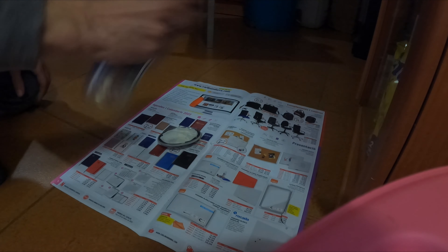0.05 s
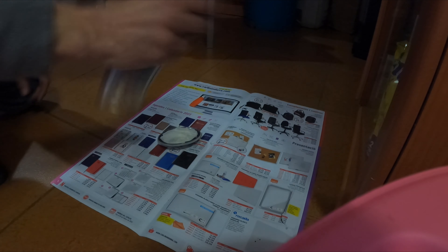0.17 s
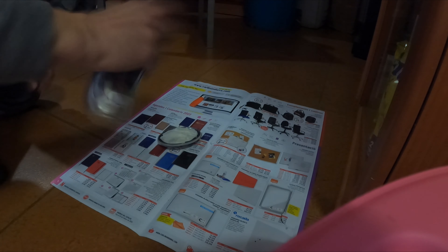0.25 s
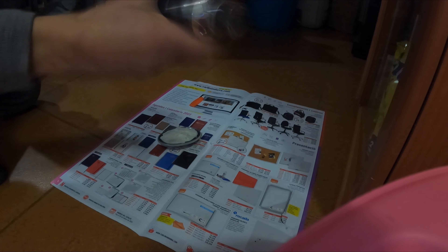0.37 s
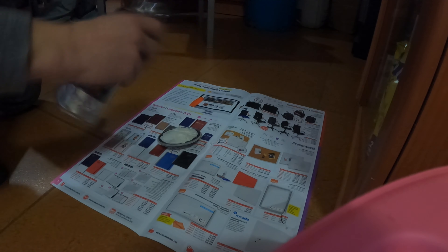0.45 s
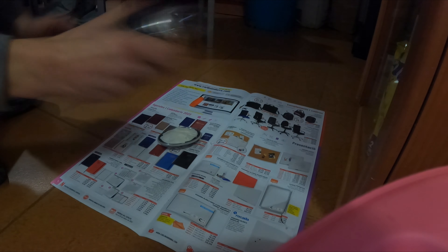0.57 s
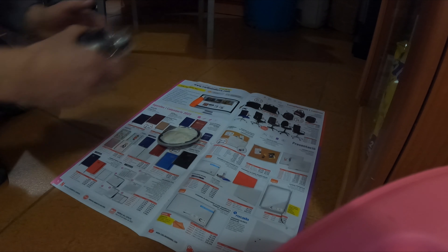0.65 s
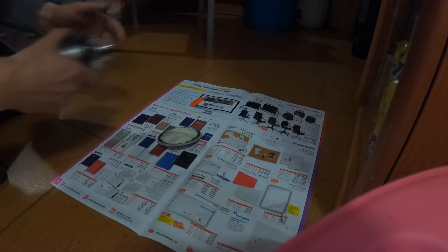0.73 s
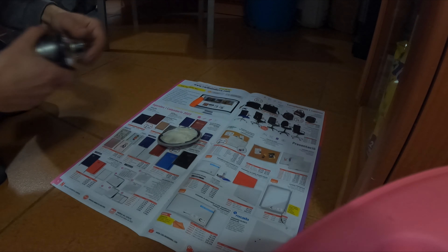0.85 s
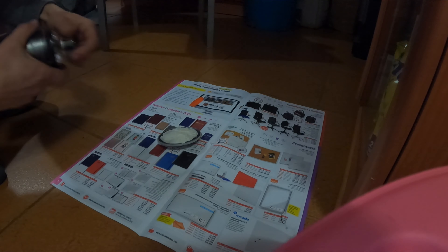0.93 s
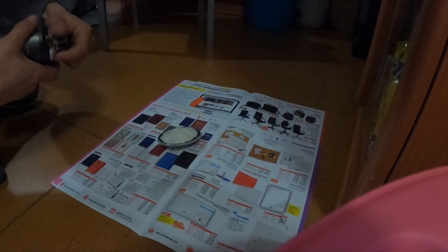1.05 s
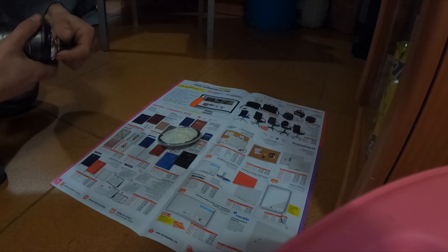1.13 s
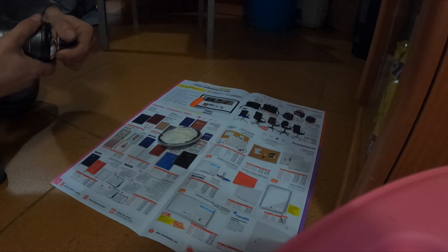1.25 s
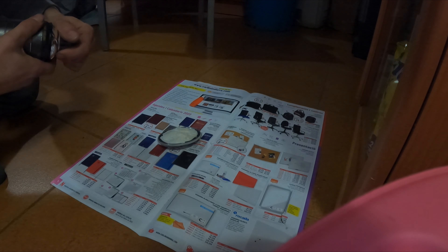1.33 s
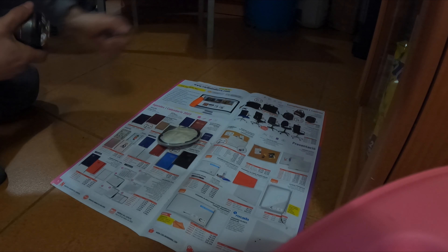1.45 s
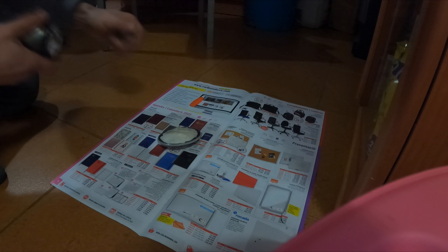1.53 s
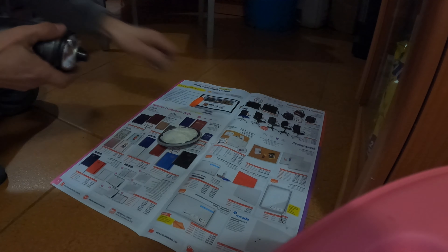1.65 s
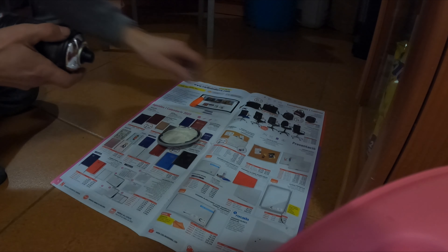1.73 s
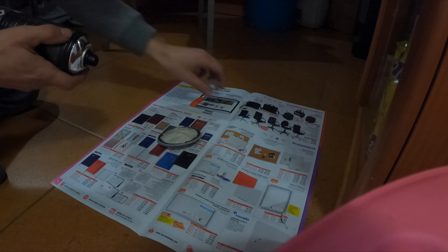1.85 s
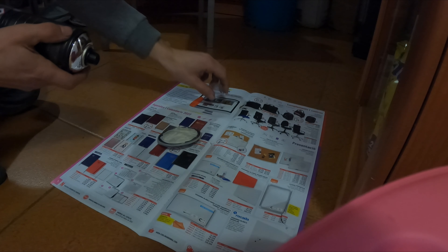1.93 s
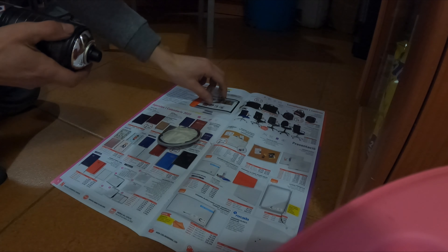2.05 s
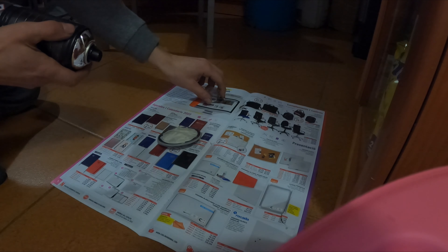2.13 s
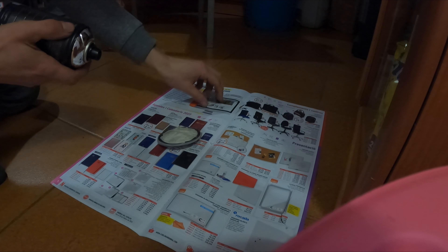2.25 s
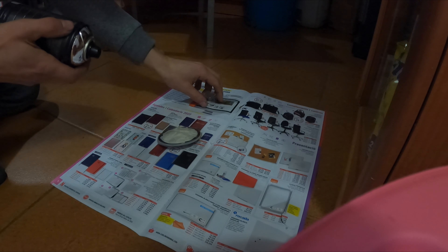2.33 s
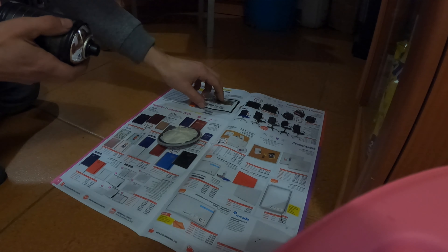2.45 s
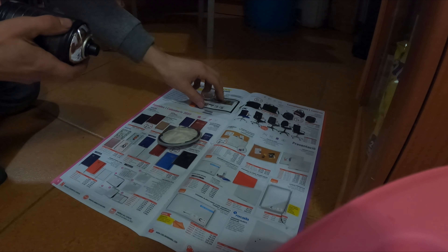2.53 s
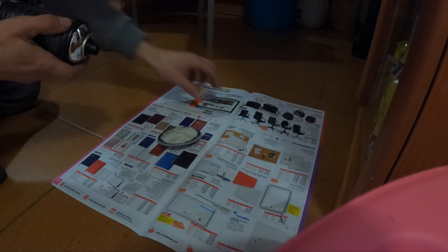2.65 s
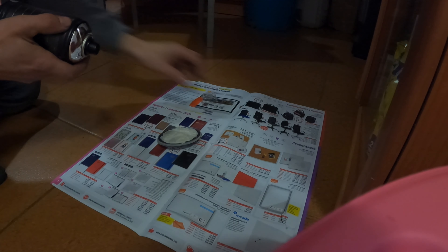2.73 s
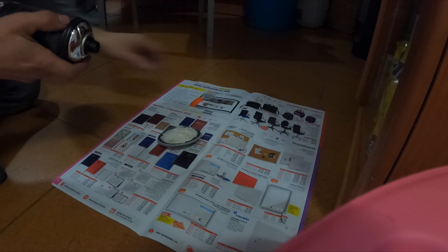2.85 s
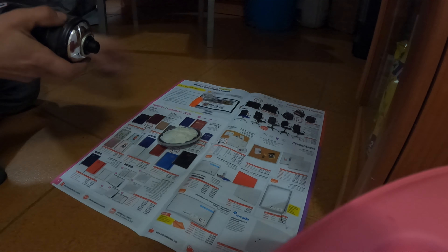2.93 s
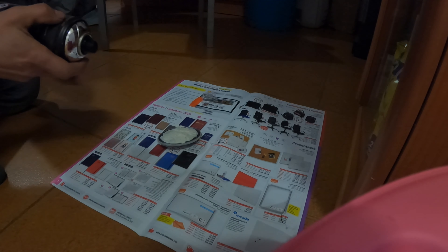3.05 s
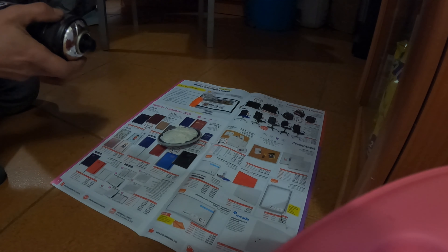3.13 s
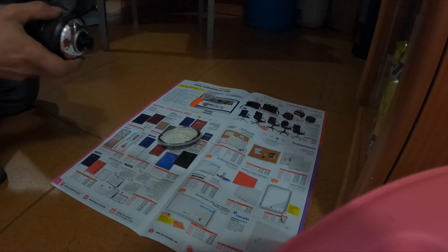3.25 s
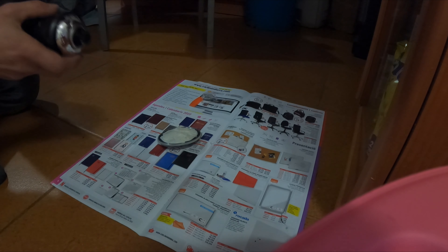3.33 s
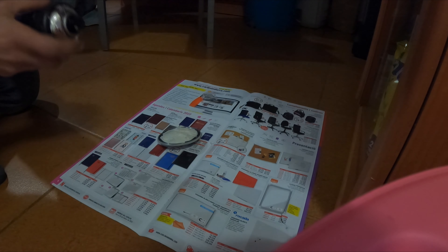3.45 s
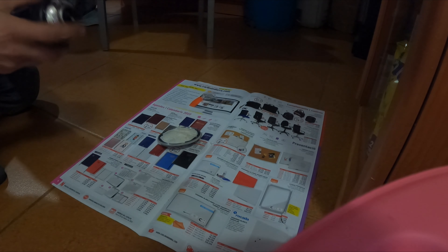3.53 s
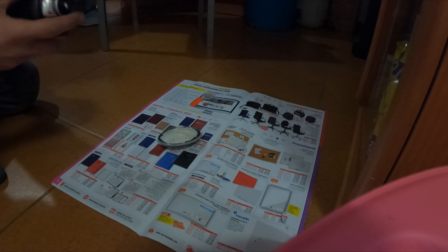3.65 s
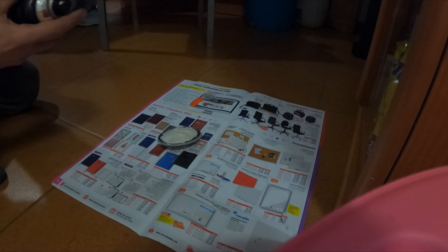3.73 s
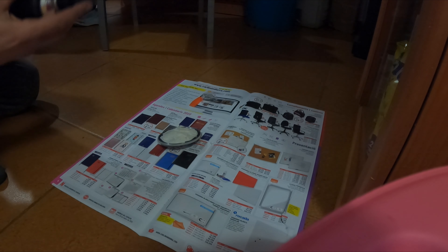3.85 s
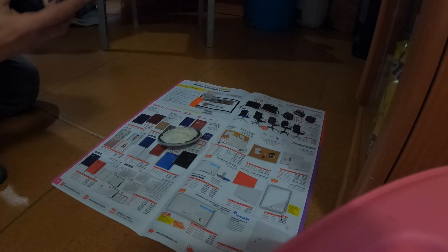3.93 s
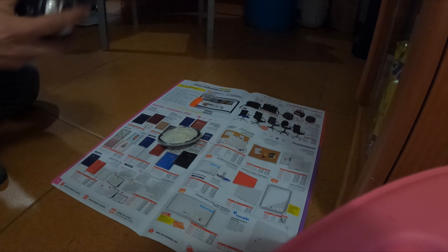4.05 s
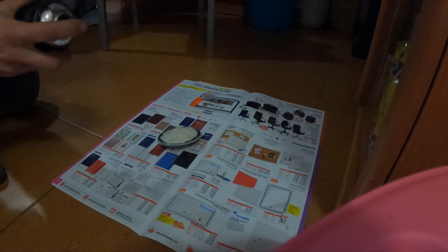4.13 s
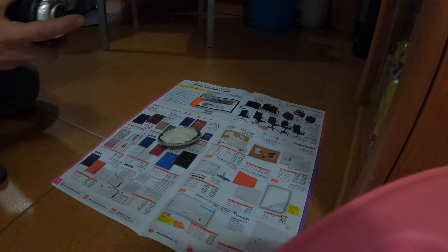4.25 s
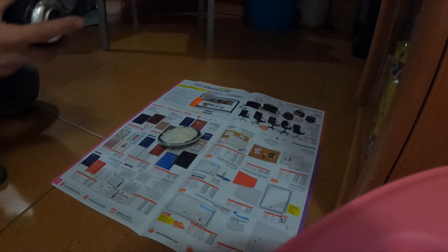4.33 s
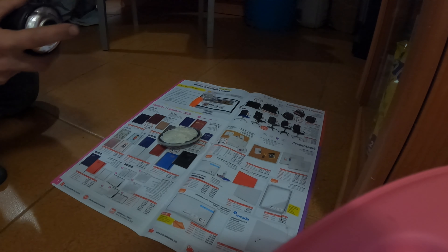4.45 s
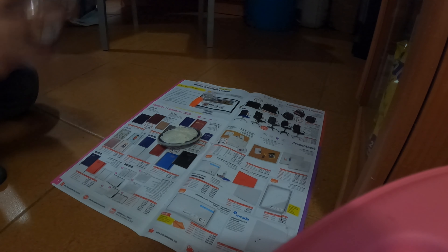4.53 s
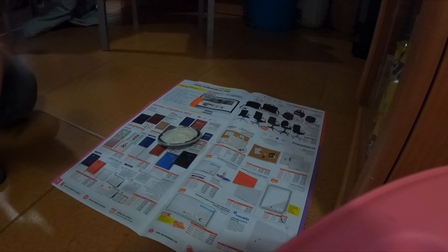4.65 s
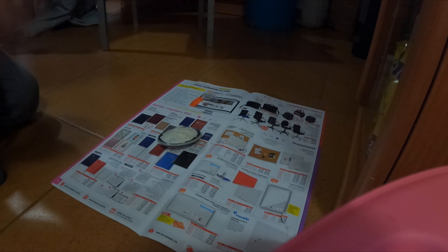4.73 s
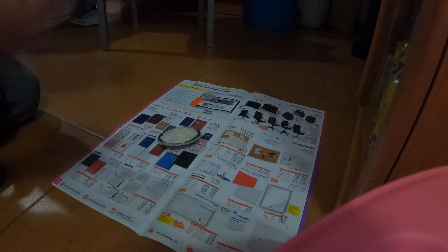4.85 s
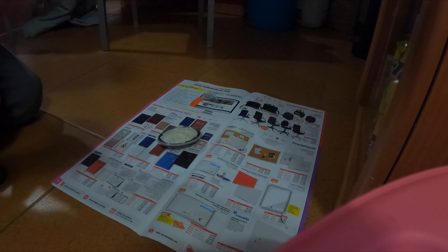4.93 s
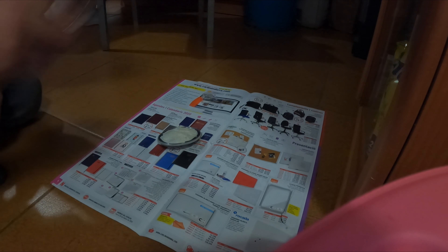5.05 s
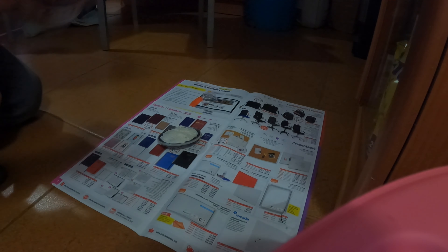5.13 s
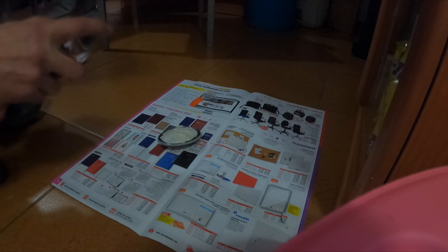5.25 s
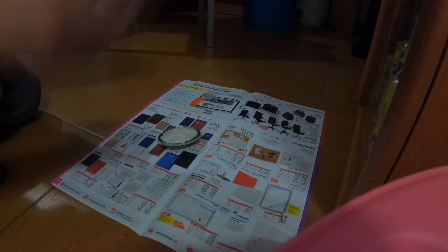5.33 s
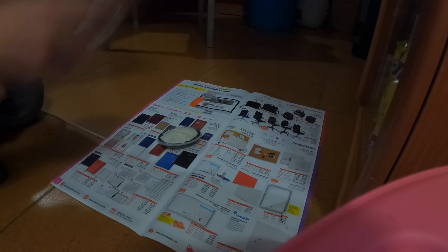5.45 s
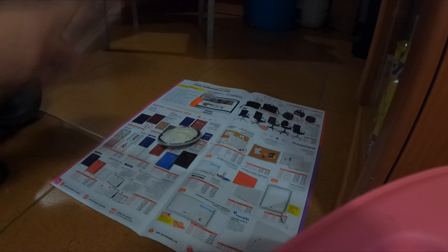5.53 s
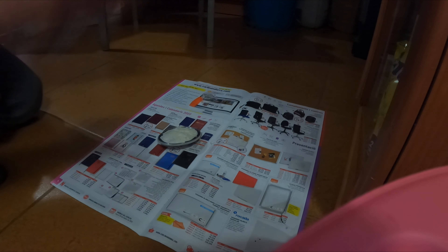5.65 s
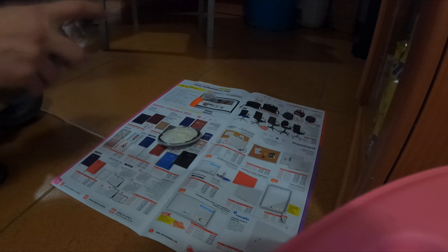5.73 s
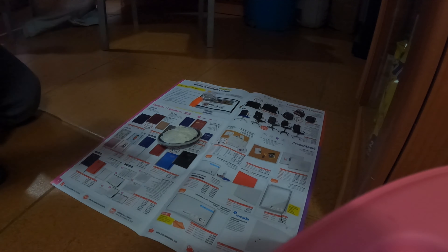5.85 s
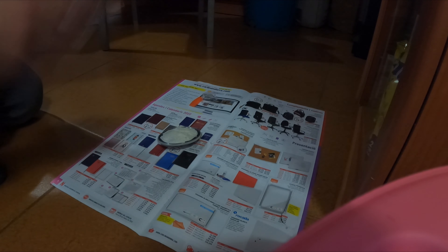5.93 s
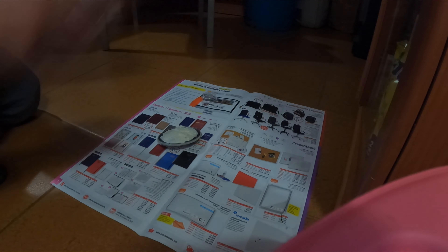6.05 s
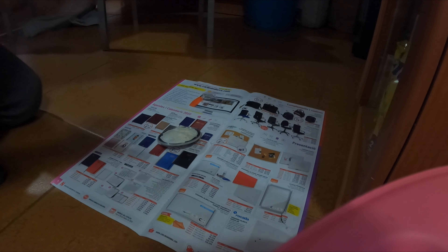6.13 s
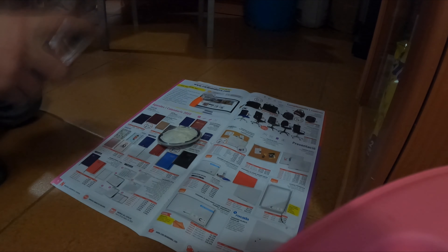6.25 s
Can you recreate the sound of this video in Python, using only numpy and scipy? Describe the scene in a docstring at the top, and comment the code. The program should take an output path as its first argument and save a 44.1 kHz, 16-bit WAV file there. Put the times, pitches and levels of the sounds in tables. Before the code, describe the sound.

Close to the microphone in a small tiled room, a metal spray can is shaken, its mixing ball clacking brightly through sloshing paint. The rattle thins to small rolling clicks as the can is tilted. A plastic cap is set down with two quick, faint hollow taps. After near quiet and a few light knocks, vigorous shaking returns, with low puffs of air bumping the microphones. Faint rumble and motor hum lie beneath.

```python
"""Close by in a small tiled room, a steel aerosol can is shaken over a low rumble, far-off hum and room tone.
Its contents roll and slosh in quick swells and the mixing ball knocks, exciting damped modes of dome and wall.
The can is tilted, then at 2.5 s its plastic cap is set down with two hollow taps. Sparse rolling and knocks
lead to hard shaking from 4.7 s, whose strokes puff air at the microphones: a push, a swing back, turbulence.
Echoes from the room follow can and cap: noise tails whose pattern shifts slowly."""
import sys
import numpy as np
from scipy import signal
from scipy.fft import rfft, irfft
from scipy.io import wavfile
from scipy.ndimage import uniform_filter1d

SR = 44100
rng = np.random.default_rng(int(sys.argv[2]) if len(sys.argv) > 2 else 0)


def wav_record(signal):
    """Record a signal, one row per channel, as 16-bit PCM in the file named by sys.argv[1]."""
    frames = np.transpose(np.atleast_2d(signal))
    bounded = np.clip(frames, -1, 1)
    # unit amplitude maps onto the largest positive 16-bit level
    quanta = np.round(bounded * 32767).astype(np.int16)
    wavfile.write(sys.argv[1], SR, quanta)


N = 277389

# The low rumble, a drone with loose noise. Each row: time in seconds, level in dB.
RUMBLE_LEVEL = [(0, -51), (.3, -51.5), (1, -53), (1.45, -58), (2.1, -56.5), (2.84, -66), (3.075, -48.5),
                (3.3, -73.5), (3.84, -70), (4.3, -58.5), (4.86, -52), (5.3, -69), (5.6, -64), (6.29, -59.5)]
RUMBLE_HZ, RUMBLE_NOISE = 28.2, 0.35   # drone pitch; rms of the noise relative to the drone
# The hum of a far-off appliance. Each row: time in seconds, level in dB about which it wavers.
HUM_LEVEL = [(0, -66.5), (.9, -67.5), (2.4, -62.5), (3.4, -61), (4.7, -65), (6.29, -70.5)]
# Weaker orders of the same motor. Each row: share of the hum pitch, mean level in dB relative to the main tone.
HUM_LOWER_ORDERS = [(.25, -12.5), (.5, -15.5), (.75, -9.5)]
HUM_HZ, HUM_NOISE = 194.5, 0.55   # pitch; rms of narrow noise relative to the main tone
HUM_WAVER_DB = 2.5
# Spectrum of the room tone. Each row: frequency in Hz, relative density in dB per Hz.
AIR_SPECTRUM = [(60, -33.5), (100, -16), (150, -3.5), (250, -9.5), (400, -12), (700, -19.5), (1300, -16.5),
                (1900, -32.5), (2550, -23.5), (3300, -42.5), (6000, -52), (14000, -34)]
AIR_LEVEL_DB = -67.0
# Quick swells of the rolling and sloshing: shaking strokes, and small rustles near 2.5 to 3.1 s. Levels
# before the can's filters. Each row: crest in seconds, dome level in dB, wall level in dB, hold in seconds.
SWELLS = [(0, -38, -37.5, 0.0021), (0.117, -42, -33.5, 0.0046), (0.197, -42.5, -42.5, 0.0069),
          (0.314, -39, -35.5, 0.0065), (0.429, -39.5, -31.5, 0.01), (0.522, -40, -34, 0.011),
          (1.814, -44.5, -68, 0.013), (2.508, -58, -56.5, 0.0055), (2.756, -65.5, -60.5, 0.0046),
          (3.081, -60.5, -55, .01), (3.547, -60, -65, 0.012), (4.312, -46, -46.5, 0.0046),
          (4.645, -49, -56, 0.0078), (4.742, -35, -38, 0.036), (4.943, -36, -34.5, 0.012),
          (5.193, -39, -33.5, 0.023), (5.363, -43.5, -37.5, 0.097), (5.56, -52, -45, 0.036),
          (5.66, -44.5, -38, 0.059), (5.902, -41.5, -34.5, 0.019), (6.068, -44, -41, 0.082),
          (6.205, -53, -41, 0.049)]
SWELL_RISE_DB_PER_S, SWELL_FALL_DB_PER_S = 241, 144
# Steady rolling of the ball through the paint, levels before the can's filters.
# Each row: time in seconds, dome level in dB, wall level in dB.
ROLL_LEVEL = [(0, -77, -84), (.55, -49.5, -48), (.68, -37, -34), (.8, -42, -36), (.95, -49, -41),
              (1.33, -52, -46.5), (1.7, -57, -51.5), (1.86, -46.5, -50), (2.3, -53, -56.5),
              (2.65, -80.5, -70.5), (3.0, -79, -81.5), (3.3, -88, -81), (3.47, -81, -69.5),
              (3.68, -51.5, -50), (3.9, -48.5, -51.5), (4.12, -56, -53.5), (4.25, -54.5, -58),
              (4.56, -66, -68), (4.8, -86, -61), (6.29, -70, -95)]
# Where the paint lies decides which modes stay free; a quick wander is added.
# Each row: time in seconds, freest dome pitch in Hz, freest wall pitch in Hz.
PAINT_POSITION = [(0, 4900, 1540), (.55, 4784, 1524), (.8, 4280, 1995), (1.31, 5380, 1509),
                  (2.0, 5160, 1836), (2.3, 4250, 2140), (2.62, 4290, 1900), (2.76, 4350, 2306),
                  (3.2, 4350, 2200), (3.45, 5610, 1290), (3.6, 6300, 2193), (3.72, 5670, 1600),
                  (3.84, 5580, 1233), (4.0, 5560, 1369), (4.15, 4920, 2090), (4.56, 6270, 1760),
                  (6.29, 4980, 1575)]
PAINT_WANDER = 0.05   # spread as a share of the pitch
GLIDE_DB, GLIDE_WIDTH = -8, 0.07   # gliding band against the ringing modes; filter corner as a share of mean pitch
ROLL_ALIKE, ROLL_ALIKE_LOSS = 1, 0.061   # left-right likeness at 1 kHz; its loss per octave
# Clear knocks of the ball, levels before the can's filters. Each row: start in seconds, dome peak in dB,
# wall peak in dB, freest dome pitch in Hz, freest wall pitch in Hz.
KNOCKS = [(0.0148, -14.5, -18, 4350, 1800), (0.077, -3, -18, 4330, 2980), (0.0837, -13.5, -20, 6100, 1200),
          (0.0922, -7, -31, 4770, 1177), (0.279, -5, -15.5, 5490, 1550), (0.329, -23.5, -15.5, 4120, 1700),
          (0.337, -38, -15.5, 4350, 1430), (0.344, -45, -20, 3260, 1680),
          (0.4236, -12.5, -11.5, 7900, 1790), (0.4395, -22, -13.5, 3000, 1690),
          (0.4551, -39, -21, 3420, 1680), (0.5246, -27, -24, 3330, 1090), (0.6043, -9, -11.5, 4540, 2290),
          (0.627, -41, -16.5, 3070, 1867), (0.6414, -7.5, -7.5, 4350, 1740), (0.6977, -48, -26, 4820, 1940),
          (0.71, -35, -20, 3400, 2000), (0.7507, -29, -19.5, 5600, 1950),
          (0.7992, -23.5, -13.5, 4130, 2080), (0.86, -27, -22.5, 5700, 2800),
          (0.9116, -31, -21, 3070, 2080), (1.008, -33, -25.5, 4200, 1840), (1.063, -26.5, -30, 4660, 2260),
          (1.1874, -34.5, -30, 6130, 1800), (1.2607, -34, -33, 4950, 1800),
          (1.2706, -34, -24.5, 5850, 1070), (1.3952, -27, -28, 6100, 1720), (1.411, -23, -21.5, 7260, 1790),
          (1.4252, -22.5, -27, 3740, 1700), (1.4503, -33, -38, 3780, 1700),
          (1.4675, -21.5, -14.5, 6050, 1530), (1.4719, -22, -11, 7670, 1684),
          (1.4852, -17, -23, 5186, 1700), (1.5568, -7, -24, 5000, 2640), (1.604, -19, -18, 6560, 1710),
          (1.6391, -23, -17, 4440, 1654), (1.669, -30, -32.5, 6700, 1330), (1.724, -20, -15.5, 4700, 1470),
          (1.762, -23, -25.5, 4640, 1140), (1.801, -15, -25, 4380, 1360), (1.805, -9, -26, 4540, 1990),
          (1.876, -9.5, -25, 4560, 1060), (1.9106, -14.5, -34, 4230, 2510),
          (1.9391, -16.5, -32, 5250, 2420), (1.9632, -18, -37, 5400, 2400),
          (1.9715, -7.5, -32.5, 5200, 2310), (1.986, -20.5, -38, 4570, 1940), (2.008, -12, -39, 5200, 2900),
          (2.0344, -22, -42, 5240, 1710), (2.048, -17, -23, 5930, 1700), (2.0534, -25, -45, 5130, 2440),
          (2.0687, -17.5, -40, 5260, 2410), (2.077, -20.5, -46, 5200, 2010),
          (2.0883, -24.5, -51, 5300, 1580), (2.1012, -22.5, -41, 5220, 2000),
          (2.1133, -19, -27.5, 4530, 2040), (2.183, -25.5, -52, 6600, 2560),
          (2.254, -21, -39.5, 6800, 2500), (2.2595, -21.5, -33, 5430, 2030), (2.273, -36, -42, 3760, 2050),
          (2.2903, -28, -56, 4270, 2090), (2.299, -34, -34, 4200, 2090), (2.395, -33, -36, 7850, 2630),
          (2.5133, -37.5, -36, 3980, 1360), (2.7704, -50, -46.5, 4240, 2730),
          (2.7943, -40, -42, 4460, 2730), (3.0048, -51.5, -49, 3470, 2500), (3.073, -43, -47, 3360, 2190),
          (3.0866, -37.5, -50.5, 7740, 2380), (3.489, -47.5, -54.5, 5830, 2600),
          (3.5597, -36, -41, 7600, 2410), (3.595, -16, -21.5, 7650, 2600), (3.6478, -22, -25, 7700, 2120),
          (3.6837, -24.5, -27, 6000, 1570), (3.7099, -30, -30.5, 5020, 2040),
          (3.7283, -27, -31.5, 5700, 2400), (3.898, -29, -36, 7200, 2370),
          (3.975, -27.5, -38.5, 7450, 2480), (4.2217, -41, -51, 4940, 1380), (4.2333, -36, -39, 4640, 2590),
          (4.2722, -21.5, -26.5, 7040, 2580), (4.2974, -20.5, -41, 5300, 1580),
          (4.3024, -19, -26.5, 7100, 2450), (4.3238, -21, -33, 4970, 1570), (4.3415, -37, -37, 6900, 2900),
          (4.608, -17.5, -24, 7300, 2360), (4.617, -21, -24, 6750, 2310), (4.627, -15, -23.5, 7500, 2330),
          (4.7025, -5.5, -22.5, 4430, 1255), (4.7258, -12, -29, 6210, 2480), (4.7576, -10, -39, 7700, 1680),
          (4.8064, -14, -25, 6930, 1480), (4.8302, -22, -12.5, 4330, 1760), (4.8374, 4.5, -41, 4940, 1830),
          (4.8438, -14, -46, 4900, 2750), (4.9438, -7.5, -12, 8370, 1920), (4.9489, -15, -11.5, 5310, 2210),
          (4.9747, -17, -20.5, 5470, 2500), (5.0169, -15, -13.5, 4370, 1510),
          (5.022, -20, -13.5, 4330, 1460), (5.04, -2, -18, 5220, 1620), (5.0685, -5, -13.5, 4860, 2475),
          (5.122, -16.5, -45, 5730, 1350), (5.1356, -31, -21, 5230, 1440), (5.1497, -36, -27, 4050, 2380),
          (5.1682, -12, -7.5, 7200, 2080), (5.1817, -7, -8.5, 7260, 2020), (5.2278, -34, -16.5, 4800, 1590),
          (5.2496, -22, -12, 3900, 2060), (5.2792, 1.5, -20, 6870, 1230), (5.2871, -4.5, -14.5, 4630, 2320),
          (5.2991, -9.5, -34, 5190, 1900), (5.3231, -10, -36, 5930, 2080), (5.345, -13, -21, 5900, 1380),
          (5.3597, -21, -21.5, 5930, 1450), (5.4153, -7.5, -6, 7660, 2200),
          (5.4698, -37, -18.5, 3230, 2230), (5.5152, -27, -18, 5760, 1920), (5.5229, 2, -33, 5950, 1270),
          (5.5354, -20, -22, 4320, 2380), (5.541, -11, -35, 4600, 1900), (5.5432, -4.5, -40, 5340, 1420),
          (5.606, -30, -17.5, 3600, 1790), (5.6562, -6.5, -6.5, 7570, 1610), (5.709, -21, -16, 7360, 1910),
          (5.753, -27, -14, 3540, 2010), (5.7605, -1, -26, 4450, 2300), (5.7891, -4, -25, 5330, 2720),
          (5.808, -12.5, -37, 5950, 2620), (5.8821, -8, -11, 7550, 2630), (5.9048, -12, -11, 4340, 1300),
          (5.9639, -22, -14.5, 4140, 1870), (5.9694, -21.5, -11.5, 5770, 1658),
          (6.022, -1.5, -7.5, 6100, 2240), (6.0397, -18, -27, 5280, 2430), (6.1011, -26, -13, 5470, 1420),
          (6.1264, -27, -26, 4960, 1780), (6.1524, -3, -9, 7040, 1647), (6.224, -20, -15, 6800, 1874),
          (6.2394, -17, -14.5, 5920, 1160), (6.2801, -0.5, -21.5, 5000, 1320),
          (6.2849, -5, -37, 5900, 1180), (6.2876, -11, -44, 7400, 1690)]
# Modes of the domed ends, before knocks cap the ring and rolling damps it.
# Each row: frequency in Hz, relative level in dB, 60 dB decay in seconds.
DOME_MODES = [(3530, -12.5, 0.061), (4060, -9, 0.071), (4430, 8, 0.003), (5044, 13, 0.0017),
              (5353, -12, 0.0075), (6215, 12, 0.0016), (6230, -6.5, 0.0034), (7547, 9.5, 0.0041),
              (7810, 4, 0.02), (8560, -11.5, 0.014), (9740, -10, 0.0082), (12000, 1, 0.0087),
              (14150, -30, .004)]
# Broad modes of the paint-damped wall, before knocks cap the ring and rolling damps it.
# Each row: frequency in Hz, relative level in dB, 60 dB decay in seconds.
WALL_MODES = [(954, 19, 0.017), (1106, 10.5, 0.033), (1220, 6, 0.03), (1625, 23, 0.0018), (1680, 8, 0.016),
              (2105, 20, 0.0043), (2370, 5.5, 0.028), (2667, 12, 0.021)]
# The whole can jolting in the hand. Each row: frequency in Hz, relative level in dB, 60 dB decay in seconds.
GRIP_MODES = [(344.5, -1, 0.0092), (478, -3, 0.018)]
# Where the hand holds the can. Each row: time in seconds, left over right in dB (the wall takes a share of it).
HAND_PLACE = [(0, -0.5), (.8, 3), (1.8, 2.5), (2.4, 1.5), (4.7, 4), (5.6, 1.5), (6.29, 2.5)]
FREEST_DB = 3   # the freest mode over the strongest tabled one, before soft knocks are dulled
KNOCK_OCTAVES = 0.55   # how narrowly a knock favours the freest modes
SOFT_DULL_DB, BRIGHT_HZ = 0.25, 8000   # loss per octave above this pitch, per dB that a knock lies below 0 dB
CONTACT_S = 0.000018   # the ball's press rises and fades with this time
FLOOR_ECHO_S, FLOOR_ECHO = 0.0013, 0.23   # the tiles return each knock: delay, mean share
# The main and early decay of the echoes, and the corner where the walls dull them.
ROOM_T60_S, EARLY_T60_S, WALL_CUT_HZ = 0.39, 0.059, 5800
# Taps of the plastic cap set down on the newspaper. Each row: start in seconds, relative level in dB.
CAP_TAPS = [(2.4847, -32), (2.4916, -21.5)]
# The cap's hollow ring. Each row: frequency in Hz, relative level in dB, 60 dB decay in seconds.
CAP_MODES = [(1360, -4, 0.04), (1536, 2, 0.02), (1970, 2, 0.049)]
# Air puffs on the microphones. Each row: start in seconds, signed push in amplitude, push length in seconds,
# left over right in dB.
PUFFS = [(4.806, 0.023, 0.0074, -0.5), (4.84, -0.057, 0.0044, 6), (4.875, -0.013, 0.011, 0),
         (5.039, -0.037, 0.0018, 3), (5.2977, -0.12, 0.0048, -9.5), (5.544, -0.022, 0.0017, -7),
         (5.791, -0.04, 0.003, -7.5), (6.022, 0.016, 0.002, -1)]
PUFF_BACK_S = 0.014   # length of the swing back
PUFF_FLUTTER = 0.41   # turbulence against the push, for a push as long as the swing back
MIC_DULL_HZ, CUTOFF_HZ = 13040, 16600   # gentle microphone roll-off; steep top cut


def from_db(db):
    """Decibels to gain."""
    return 10 ** (np.asarray(db) / 20)


def rms_one(x):
    """Scale to unit power."""
    return x / np.sqrt(np.mean(x ** 2) + 1e-20)


def in_time(rows):
    """Each column of a curve, sample by sample."""
    s, *columns = np.transpose(rows)
    return [np.interp(np.arange(N) / SR, s, column) for column in columns]


def sides(pan_db):
    """Left and right gains for a level difference."""
    return from_db(np.array([pan_db / 2, -pan_db / 2]))


def drift(rate):
    """Slow chance of spread 1: noise smoothed twice at this rate in Hz, made at a fortieth of the sample rate."""
    r = np.exp(-80 * np.pi * rate / SR)
    noise = rng.standard_normal(N // 40 + 2002)
    slow = signal.lfilter([1], [1, -2 * r, r * r], noise)[2000:]
    return np.interp(np.arange(N) / 40, np.arange(len(slow)), rms_one(slow))


def stereo_noise(alike):
    """White noise, partly shared by both sides."""
    mid, side = rng.standard_normal((2, N))
    return np.sqrt(1 + alike) * mid + np.sqrt(1 - alike) * side * [[1], [-1]]


def ring(clicks, hz, t60):
    """A damped resonator: a unit click sets a sine of height 1 ringing."""
    r, w = from_db(-60 / (t60 * SR)), 2 * np.pi * hz / SR
    return signal.lfilter([0, np.sin(w)], [1, -2 * r * np.cos(w), r * r], clicks + 1e-18)


def tone(hz, wander_hz, rate):
    """A steady tone whose pitch wanders a little; rms 1."""
    return np.sqrt(2) * np.sin(2 * np.pi * np.cumsum(hz + wander_hz * drift(rate)) / SR)


def high_pass(x, hz, order):
    """A small body radiates little below its lowest mode."""
    return signal.sosfilt(signal.butter(order, hz, "high", fs=SR, output="sos"), x)


def nearness_db(hz, centre_hz, octaves):
    """Modes far from the freest pitch are held back, by 12 dB at most."""
    return np.maximum(-6 * (np.log2(hz / centre_hz) / octaves) ** 2, -12)


def rumble():
    """A low wandering drone with band-limited noise about it."""
    level_db, = in_time(RUMBLE_LEVEL)
    band = signal.butter(2, [23, 48], "band", fs=SR, output="sos")
    loose = rms_one(signal.sosfilt(band, stereo_noise(0.96)))
    drone = tone(RUMBLE_HZ, 0.95, 1.5) + RUMBLE_NOISE * loose
    return from_db(level_db) * rms_one(drone) * sides(-0.73)[:, None]


def hum():
    """A narrow wavering motor hum with lower orders and resonant noise."""
    level_db = in_time(HUM_LEVEL)[0] + HUM_WAVER_DB * drift(1.1)
    motor = tone(HUM_HZ, 0.8, 2) + HUM_NOISE * rms_one(ring(stereo_noise(0.84), HUM_HZ, 0.22))
    for share, db in HUM_LOWER_ORDERS:
        motor += from_db(db + HUM_WAVER_DB * drift(2.4)) * tone(share * HUM_HZ, 0.55, 3)
    return from_db(level_db) * rms_one(motor) * sides(-1.0)[:, None]


def room_tone():
    """Steady noise shaped by the spectrum of the resting room."""
    hz = np.maximum(np.fft.rfftfreq(N, 1 / SR), 1)
    table_hz, table_db = np.transpose(AIR_SPECTRUM)
    shape = from_db(np.interp(np.log(hz), np.log(table_hz), table_db, left=-40))
    air = irfft(rfft(stereo_noise(0.43)) * shape, N)
    return from_db(AIR_LEVEL_DB) * rms_one(air)


def rolling_db():
    """Steady rolling plus swells, each a quick rise, a hold and a slower fall: dB for dome and wall."""
    t = np.arange(N) / SR
    power = from_db(in_time(ROLL_LEVEL)) ** 2
    for s, dome_db, wall_db, hold in SWELLS:
        rise_db = SWELL_RISE_DB_PER_S * (s - t)
        fall_db = SWELL_FALL_DB_PER_S * np.maximum(t - s - hold, 0)
        loss_db = np.maximum(rise_db, fall_db)
        power = power + from_db(np.array([[dome_db], [wall_db]]) - loss_db) ** 2
    return 10 * np.log10(power)


def glide(free_hz):
    """A narrow band of noise that follows the freest pitch as the paint moves; rms 1."""
    cut = signal.butter(2, GLIDE_WIDTH * free_hz.mean(), fs=SR, output="sos")
    turn = 2 * np.pi * np.cumsum(free_hz) / SR
    return rms_one(sum(signal.sosfilt(cut, stereo_noise(0.9)) * wave(turn) for wave in (np.sin, np.cos)))


def rolled(modes, free_hz, per_s, grain_db, damping, octaves):
    """Dense uneven contacts over the hiss of the paint, fed to the modes; rms 1."""
    sizes = from_db(grain_db * np.minimum(rng.exponential(1, N), 3.5))
    contacts = sizes * (rng.random(N) < per_s / SR)
    touches = (0.18 + contacts) * from_db(1.5 * drift(24.5))
    grain = np.sqrt(uniform_filter1d(touches ** 2, size=200))      # the gliding band is as lumpy as the contacts
    out, power = 0, 0
    for hz, level_db, t60 in modes:
        gain = from_db(level_db + nearness_db(hz, free_hz, octaves))
        alike = np.clip(ROLL_ALIKE - ROLL_ALIKE_LOSS * np.log2(hz / 1000), 0, 1)
        push = touches * gain * from_db(3.24 * drift(25.0)) * stereo_noise(alike)
        out = out + ring(push, hz, t60 * damping)
        power = power + gain ** 2 * t60
    ringing = rms_one(out / np.sqrt(power))      # evens out level changes as modes come free
    return rms_one(ringing + from_db(GLIDE_DB) * rms_one(grain * glide(free_hz)))


def struck(modes, times, peak_db, centre_hz, chatter_s, chatter, detune, longest_s):
    """Every knock is a click with a short rattling contact; the moving paint shifts the modes from knock to knock."""
    hz, level_db, t60 = np.transpose(modes)
    t60 = np.minimum(t60, longest_s)      # paint over the steel cuts the ring short
    t = np.arange(int(0.05 * SR)) / SR
    luck = rng.standard_normal((len(times), 3, len(hz)))

    contact = chatter * rng.standard_normal((len(times), 1, 300)) * np.exp(-t[:300] / chatter_s)
    contact[:, :, 0] = 1
    contact[:, :, round(FLOOR_ECHO_S * SR)] += FLOOR_ECHO * (1 + luck[:, :1, 0] / 2)
    press = t[:40] / CONTACT_S * np.exp(-t[:40] / CONTACT_S)
    contact = signal.lfilter(press, [1], contact)

    favour_db = nearness_db(hz, centre_hz[:, None], KNOCK_OCTAVES)
    strength = from_db(level_db + favour_db + 2 * luck[:, 0])
    freest = np.abs(np.log(hz / centre_hz[:, None])).argmin(axis=1)
    strength[np.arange(len(times)), freest] = from_db(level_db.max() + FREEST_DB)
    octaves_above = np.maximum(np.log2(hz / BRIGHT_HZ), 0)
    strength *= from_db(SOFT_DULL_DB * np.minimum(peak_db, 0)[:, None] * octaves_above)

    out = np.zeros((2, N + 2 * len(t)))
    for k, s in enumerate(times):
        shifted_hz = hz * (1 + detune * luck[k, 1])
        shifted_hz[freest[k]] = centre_hz[k]
        polarity = np.sign(luck[k, 1])[:, None]
        rings = polarity * np.sin(2 * np.pi * shifted_hz[:, None] * t) * from_db(-60 * t / t60[:, None])
        apart = from_db(hz / 3200 * luck[k, 2] * [[1], [-1]])      # each side faces the modes at another angle
        knock = signal.fftconvolve((apart * strength[k]) @ rings, contact[k], axes=1)
        at = round(s * SR)
        out[:, at:at + knock.shape[1]] += from_db(peak_db[k]) * knock / np.abs(knock.mean(axis=0)).max()
    return out[:, :N]


def can(roll_db):
    """Knocks and rolling on dome and wall, placed where the hand holds the can, plus its jolt in the grip."""
    free_dome_hz, free_wall_hz = [hz * (1 + PAINT_WANDER * drift(12.0)) for hz in in_time(PAINT_POSITION)]
    s, dome_db, wall_db, dome_hz, wall_hz = np.transpose(KNOCKS)
    pan_db, = in_time(HAND_PLACE)

    dome = struck(DOME_MODES, s, dome_db, dome_hz, chatter_s=0.0018, chatter=0.12, detune=0.05, longest_s=0.0055)
    dome_roll = rolled(DOME_MODES, free_dome_hz, per_s=1200, grain_db=3.0, damping=0.4, octaves=0.42)
    dome += from_db(roll_db[0]) * dome_roll

    wall = struck(WALL_MODES, s, wall_db, wall_hz, chatter_s=0.0018, chatter=0.25, detune=0.09, longest_s=0.0065)
    wall = signal.sosfilt(signal.butter(3, 3100, fs=SR, output="sos"), wall)      # the wet wall softens the contact
    wall_roll = rolled(WALL_MODES, free_wall_hz, per_s=550, grain_db=3.8, damping=0.8, octaves=0.4)
    wall += from_db(roll_db[1]) * wall_roll

    grip_db = np.maximum(wall_db, dome_db - 15.0) - 23.5
    grip = struck(GRIP_MODES, s, grip_db, np.full_like(s, 380),
                  chatter_s=0.00027, chatter=0.28, detune=0.23, longest_s=0.05)
    shell = dome * sides(pan_db) + wall * sides(0.27 * pan_db)
    return high_pass(shell, 996, order=5) + high_pass(grip, 273, order=4)


def room(x):
    """Dense echoes: a quick cluster off the floor and furniture, then the tail; the pattern shifts slowly."""
    t = np.arange(SR // 2) / SR
    dying = from_db(-60 * t / ROOM_T60_S) + 1.5 * from_db(-60 * t / EARLY_T60_S)
    gap = np.clip(t / 0.00039, 0, 1) ** 2      # echoes fade in as the nearest surface is reached
    out, turn = 0, 2 * np.pi * drift(1.99)
    for step in range(4):      # four spots in the room, each with its own echoes
        echoes = stereo_noise(0.68)[:, :len(t)] * dying * gap
        echoes = signal.lfilter(*signal.butter(1, WALL_CUT_HZ, fs=SR), echoes)
        echoes = echoes / np.sqrt(np.sum(echoes ** 2))
        share = np.cos(turn + step * np.pi / 4) / np.sqrt(2)
        out = out + signal.fftconvolve(x * share, echoes, axes=1)[:, :N]
    return out


def cap():
    """Two quick softened taps ring the modes of a light hollow shell."""
    clicks = np.zeros(N)
    for s, level_db in CAP_TAPS:
        clicks[round(s * SR)] = from_db(level_db - 9.5)
    soft = signal.sosfilt(signal.butter(2, 2500, fs=SR, output="sos"), clicks)
    shell = sum(from_db(level_db) * ring(soft, hz, t60) for hz, level_db, t60 in CAP_MODES)
    return high_pass(shell, 1160, order=4)


def puffs():
    """A quick push, a weaker swing back, and turbulence that flutters around both."""
    t, out = np.arange(N) / SR, np.zeros((2, N))
    band = signal.butter(2, [50, 220], "band", fs=SR, output="sos")
    flutter = rms_one(signal.sosfilt(band, stereo_noise(0.92)))
    for s, push, length, pan_db in PUFFS:
        after = t - s - length
        quick = np.sin(np.pi * np.clip((t - s) / length, 0, 1)) ** 2
        back = np.sin(np.pi * np.clip(after / PUFF_BACK_S, 0, 1) ** 0.59)
        gust = PUFF_FLUTTER * np.exp(-(after / (3.0 * length)) ** 2) * flutter
        out += push * (quick - 0.36 * back + gust * length / PUFF_BACK_S) * sides(pan_db)[:, None]
    return out


def scene():
    """The can and its cap with their echo, the puffs and the resting room."""
    resting = rumble() + hum() + room_tone()
    near = can(rolling_db()) + cap()
    return resting + near + from_db(-9.5) * room(near) + puffs()


def record(dry):
    """Peaks are rounded, the microphones fall off in the top octave, the top is cut."""
    rounded = 0.98 * np.tanh(dry / 0.98)
    heard = signal.sosfilt(signal.butter(3, MIC_DULL_HZ, fs=SR, output="sos"), rounded)
    return signal.sosfilt(signal.cheby2(14, 95, CUTOFF_HZ, fs=SR, output="sos"), heard)


dry = scene()
out = record(dry)
wav_record(out)
```